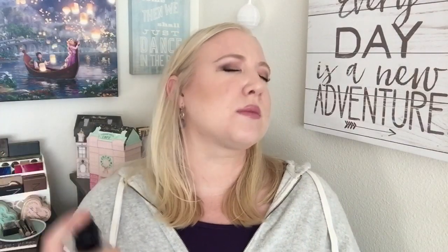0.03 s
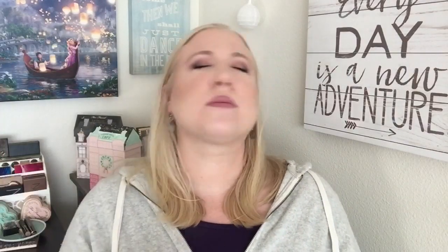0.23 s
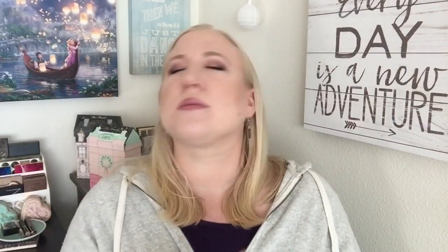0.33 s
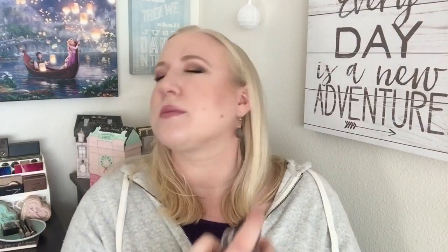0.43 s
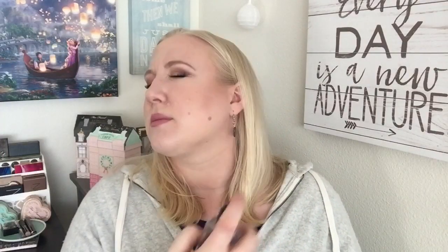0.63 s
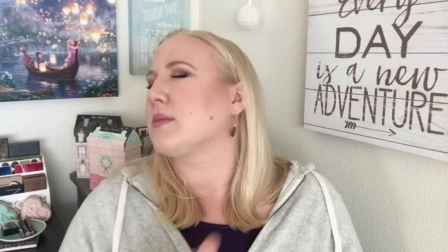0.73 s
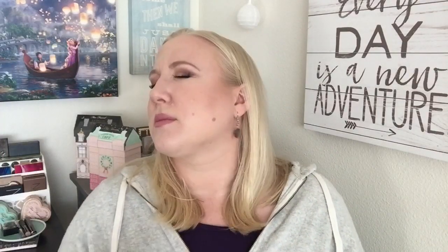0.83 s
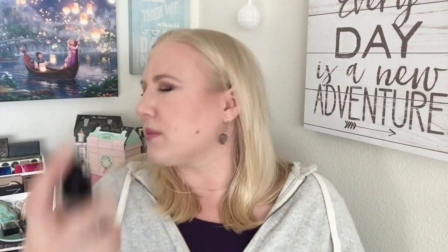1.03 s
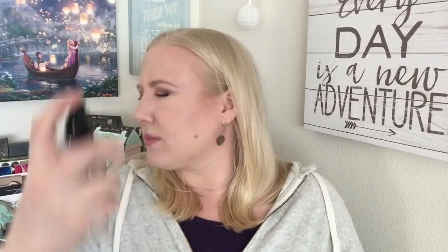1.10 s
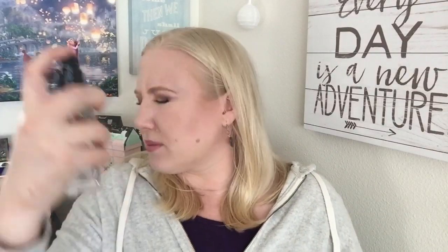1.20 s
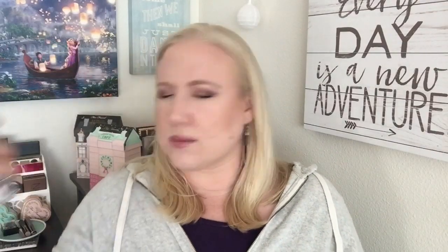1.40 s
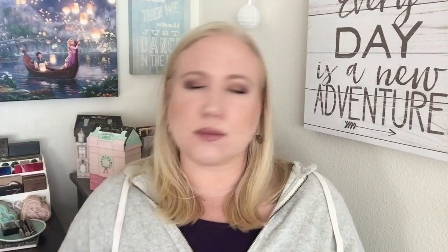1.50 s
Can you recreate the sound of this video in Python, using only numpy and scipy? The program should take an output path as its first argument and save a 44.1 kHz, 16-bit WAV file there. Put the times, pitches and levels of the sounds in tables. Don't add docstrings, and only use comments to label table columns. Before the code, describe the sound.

A plastic pump mist sprayer close to the microphone in a small furnished room. A short airy puff at 0.04 s, then three juddering strokes at about 0.23, 0.46 and 0.69 s, each a tenth-second train of sharp creaky cracks with a hollow bottle ring. Light ticks between; a faint puff at 0.98, a longer one at 1.21. Low hum; background hiss drops away near 1.4.

```python
import sys
import numpy as np
from scipy import signal
from scipy.fft import rfft, irfft, next_fast_len
from scipy.io import wavfile
from scipy.ndimage import uniform_filter1d, map_coordinates

SR = 44100
rng = np.random.default_rng(int(sys.argv[2]) if len(sys.argv) > 2 else 0)


def voltage_ratio(decibels):
    exponent = np.asarray(decibels, float) / 20
    return 10 ** exponent


def waveform_to_disk(signal):
    frames = np.transpose(np.atleast_2d(signal))
    scaled = np.clip(frames, -1, 1) * 32767
    samples = np.round(scaled).astype(np.int16)
    wavfile.write(sys.argv[1], SR, samples)


N = 68355


def along(points, hz):
    f, v = np.transpose(points)
    return np.interp(np.log(hz + 1), np.log(f + 1), v)


def coloured(spectrum):
    m = next_fast_len(N + 8192)
    gain = voltage_ratio(along(spectrum, np.fft.rfftfreq(m, 1 / SR)))
    x = irfft(rfft(rng.standard_normal(m)) * gain, m)[:N]
    return x / np.std(x)


def wobble(rate_hz):
    knots = rng.standard_normal(int(N * rate_hz / SR) + 4)
    return map_coordinates(knots, [np.arange(N) * rate_hz / SR])


def add(out, s, sound):
    out[round(s * SR):][:len(sound)] += sound


# [f/Hz, level/dB per Hz]
AIR_SPECTRUM = [(53, -45), (119, -4), (300, -13), (900, -15), (3000, -22), (7000, -25), (10000, -32),
                (16500, -39)]
# [f/Hz, level/dB per Hz]
HUM_SPECTRUM = [(25, -37.5), (40, -17), (54, -8.5), (70, -12), (95, -29.5), (140, -120)]
# [f/Hz, level/dB per Hz]
HISS_SPECTRUM = [(1000, -16), (3000, 2), (8000, -4.5), (16000, -5.5)]
AIR_DB, HUM_DB, HISS_DB = -71, -76.5, -72.5
HISS_END_S, HISS_FADE_S = 1.423, 0.068


def steady_floor():
    hiss_gate = np.clip((HISS_END_S - np.arange(N) / SR) / HISS_FADE_S, 0, 1)
    air = voltage_ratio(AIR_DB) * coloured(AIR_SPECTRUM)
    hum = voltage_ratio(HUM_DB) * coloured(HUM_SPECTRUM)
    return air + hum + voltage_ratio(HISS_DB) * hiss_gate * coloured(HISS_SPECTRUM)


SCATTER_DB, DETUNE = 2, .025


def ring(modes, pitch_hz, attack_s, luck):
    t = np.arange(SR // 10) / SR
    out = np.zeros(len(t))
    for (ratio, db, t60_s), (a, b) in zip(modes, luck):
        decay = voltage_ratio(db + SCATTER_DB * a - 60 * t / t60_s)
        out += decay * np.sin(2 * np.pi * pitch_hz * ratio * (1 + DETUNE * b) * t)
    return (1 - np.exp(-t / attack_s)) ** 2 * out


# [f/Hz, level/dB, t60/s]
HEAD_MODES = [(4260, -3, 0.0018), (7050, 0.5, 0.0021), (8000, 0, 0.00093), (12010, -1.5, 0.0023),
              (14100, -14, 0.0004)]
# [t/s, f/Hz]
GRIP_PITCH = [(.0, 1010), (.3, 1000), (.5, 920), (.75, 930), (1.1, 1000), (1.4, 1040)]
SNAP_DB, SNAP_T60_S = -12, .004


def contacts(rows, middle, middle_hz, body, attack_s, gain_db, variety):
    out, luck = np.zeros(N + SR), rng.standard_normal((len(rows), 3, 5, 2))
    t = np.arange(SR // 100) / SR
    snaps = np.diff(rng.standard_normal((len(rows), len(t) + 1))) * voltage_ratio(SNAP_DB - 60 * t / SNAP_T60_S)
    for (s, crack_db, middle_db, bottle_db), hz, z, snap in zip(rows, middle_hz, luck, snaps):
        bottle_hz = np.interp(s, *np.transpose(GRIP_PITCH))
        add(out, s, voltage_ratio(crack_db) * snap)
        add(out, s, voltage_ratio(crack_db - 1.5) * ring(HEAD_MODES, 0.96, .00005, variety * z[0]))
        add(out, s, voltage_ratio(middle_db + 3) * ring(middle, hz, 0.0001, variety * z[1]))
        add(out, s, voltage_ratio(bottle_db + gain_db) * ring(body, bottle_hz, attack_s, .25 * z[2]))
    return out[:N]


# [t/s, crack/dB, cap/dB, bottle/dB]
TICKS = [(0.008, -38, -51.5, -37.5), (0.1673, -70, -53, -52), (0.1987, -38.5, -55, -61),
         (0.3788, -39, -43, -44), (0.434, -47, -70, -49), (0.61, -35, -66, -56), (0.667, -52, -71, -73),
         (0.8958, -43.5, -56, -70), (0.9315, -46, -42.5, -72), (0.936, -38, -73, -63),
         (0.9395, -33.5, -57, -79), (1.0922, -36, -39.5, -48.5), (1.1189, -37, -40.5, -77),
         (1.1232, -43.5, -67, -61), (1.1736, -44.5, -51.5, -56), (1.3772, -37.5, -48.5, -45.5)]
# [t/s, crack/dB, cap/dB, bottle/dB]
OPENING_KNOCK = (.0001, -52, -62, -50)
# [f/Hz, level/dB, t60/s]
CAP_MODES = [(3300, 0, .006), (1950, -6, .006), (1550, -7, .006), (4000, -6, .003), (2600, -8, .004)]
# [ratio to pitch, level/dB, t60/s]
KNOCKED_BOTTLE_MODES = [(1.001, -1, .018), (1.45, -12, .012), (3.55, -19, .015)]


def ticks():
    rows = TICKS + [OPENING_KNOCK]
    unit_pitch = np.ones(len(rows))
    return contacts(rows, CAP_MODES, unit_pitch, KNOCKED_BOTTLE_MODES, 0.0051, 20.5, 0.74)


# [start t/s, hold/s, release/s, level/dB]
PUFFS = [
    (0.038, 0.058, 0.084, -47.5),
    (0.981, 0.037, 0.094, -55),
    (1.211, 0.068, 0.12, -50),
]
# [f/Hz, level/dB per Hz]
MIST_SPECTRUM = [(410, -64), (700, -27.5), (934, -26.5), (1730, -7), (3410, -4.5), (4860, -5),
                 (11800, -11.5), (16000, -13)]
PUFF_ATTACK_S, SAG_DB_PER_S = 0.016, 53


def mist():
    t = np.arange(N) / SR
    pressure = np.zeros(N)
    for s, hold_s, release_s, db in PUFFS:
        sag_db = SAG_DB_PER_S * np.clip(t - s, 0, None)
        bleed_db = 60 * np.clip(t - s - hold_s, 0, None) / release_s
        pressure += voltage_ratio(db - sag_db - bleed_db) * np.clip((t - s) / PUFF_ATTACK_S, 0, 1) ** 1.1
    droplets = voltage_ratio(0.8 * wobble(1500) + 0.44 * wobble(93.7))
    return voltage_ratio(3) * pressure * droplets * coloured(MIST_SPECTRUM)


# [start t/s, end t/s, scrape/dB, final neck f/Hz]
STROKES = [
    (.229, .315, -47, 2100),
    (.461, .562, -48, 2400),
    (.693, .80, -49, 2100),
]
NECK_START_HZ, NECK_FALL_S = 4190, 0.025


def neck_hz(s):
    start, _, _, end_hz = max(row for row in STROKES if row[0] - .005 < s)
    return end_hz + (NECK_START_HZ - end_hz) * np.exp(-(s - start) / NECK_FALL_S)


# [t/s, crack/dB, neck/dB, bottle/dB]
SLIPS = [(0.2294, -25.5, -37.5, -46.5), (0.2344, -22.5, -37, -59), (0.241, -20, -28, -63),
         (0.2473, -13.5, -36, -32.5), (0.2593, -10.5, -19, -26), (0.2752, -9.5, -15, -27.5),
         (0.2921, -12, -16.5, -27.5), (0.3049, -19, -18, -42), (0.3106, -28, -23.5, -31),
         (0.4616, -25.5, -43, -47), (0.4685, -27, -30.5, -47), (0.4774, -14.5, -28, -27),
         (0.4895, -18.5, -18.5, -25), (0.5035, -17.5, -24.5, -25.5), (0.5189, -14, -18, -24.5),
         (0.5335, -18, -18.5, -24), (0.548, -22, -20, -39), (0.5601, -24.5, -31.5, -75),
         (0.6931, -23.5, -35, -48.5), (0.7017, -20, -25.5, -33.5), (0.7135, -15.5, -23.5, -26.5),
         (0.7274, -26, -20, -27.5), (0.7428, -17.5, -25.5, -24.5), (0.7568, -28, -17.5, -34),
         (0.7688, -21, -27.5, -28.5), (0.7816, -18, -23.5, -60), (0.794, -22, -28, -35.5)]
# [t/s, level/dB, f/Hz]
COIL_CATCHES = [(0.2556, -19, 3100), (0.2709, -21, 2830), (0.2867, -23.5, 2250), (0.4737, -29, 3380),
                (0.4862, -28.5, 2940), (0.501, -17.5, 2390), (0.5161, -27, 2013), (0.5313, -41, 2600),
                (0.5467, -49, 2450), (0.7101, -25.5, 2920), (0.7246, -59, 2430), (0.7403, -27, 3840),
                (0.7565, -23.5, 2410)]
# [ratio to pitch, level/dB, t60/s]
NECK_MODES = [(1.01, -2, .006), (.78, -7, .005), (1.45, -6, .004), (.6, -8, .004)]
# [ratio to pitch, level/dB, t60/s]
BOTTLE_MODES = [(1.001, -3, 0.037), (1.223, -6.5, 0.026), (0.645, -8.5, 0.018), (0.3, -14, 0.0056)]
# [f/Hz, level/dB per Hz]
SCRAPE_SPECTRUM = [(180, -53), (300, -26.5), (762, -18), (930, -7.5), (1340, -7.5), (2480, -7.5),
                   (4990, -21.5), (11700, -15), (16000, -35)]


def piston():
    catches, push, t = np.zeros(N + SR), np.zeros(N), np.arange(N) / SR
    for (s, db, hz), z in zip(COIL_CATCHES, rng.standard_normal((len(COIL_CATCHES), 4, 2))):
        add(catches, s, voltage_ratio(db + 3.5) * ring(NECK_MODES, hz, 0.00018, .5 * z))
    for start, end, db, _ in STROKES:
        push += voltage_ratio(db) * np.clip((t - start) / 0.049, 0, 1) * np.clip((end - t) / 0.0045, 0, 1)
    scrape = push * voltage_ratio(2 * wobble(500)) * coloured(SCRAPE_SPECTRUM)
    pitch_hz = [neck_hz(row[0]) for row in SLIPS]
    return catches[:N] + scrape + contacts(SLIPS, NECK_MODES, pitch_hz, BOTTLE_MODES, .0005, 3, .8)


# [f/Hz, t60/s]
ROOM_DECAY = [(300, 0.23), (1000, 0.31), (3000, .28), (8000, 0.28), (15000, 0.28)]
# [delay t/s, level/dB]
NEAR_SURFACES = [(.0028, -14.5), (.0047, -19.5), (.0085, -25)]
WET_DB, EARLY_DB, EARLY_T60_S = -7, -8, .035


def room(x):
    hz, t, z = signal.stft(rng.standard_normal(SR // 2), SR, nperseg=256)
    decay = voltage_ratio(-60 * t / along(ROOM_DECAY, hz)[:, None])
    tail = signal.istft(z * decay, SR, nperseg=256)[1]
    early = rng.standard_normal(len(tail)) * voltage_ratio(-60 * np.arange(len(tail)) / SR / EARLY_T60_S)
    diffuse = voltage_ratio(WET_DB) * tail / np.linalg.norm(tail) + voltage_ratio(EARLY_DB) * early / np.linalg.norm(early)
    answer = np.pad(diffuse, (80, 0))
    for s, db in NEAR_SURFACES:
        answer[round(s * SR)] += voltage_ratio(db)
    return x + signal.fftconvolve(x, answer)[:N]


def scene():
    dry = ticks() + mist() + piston()
    part = np.floor((np.arange(N) / SR + .01) / .235)
    return sum(room(dry * (part == k)) for k in np.unique(part))[None]


GATE_DB, GATE_SLOPE, GATE_DEPTH_DB, GATE_S = -58, 1.5, 10, .008


def suppress(x):
    power = np.abs(uniform_filter1d(x ** 2, round(GATE_S * SR), axis=1))
    level_db = 10 * np.log10(power + 1e-12)
    return x * voltage_ratio(-np.clip(GATE_SLOPE * (GATE_DB - level_db), 0, GATE_DEPTH_DB))


LOW_CUT_HZ, TOP_HZ = 300, 15900


def band_limit(x):
    return signal.sosfilt(signal.butter(12, 16990, fs=SR, output="sos"), x)


def record(dry):
    hz = np.fft.rfftfreq(2 * N, 1 / SR)
    low_cut = (1j * hz / (LOW_CUT_HZ + 1j * hz)) ** 2
    top_cut = np.clip((TOP_HZ + 150 - hz) / 500, 0, 1) ** 2
    both = rfft(suppress(dry), 2 * N) * low_cut + rfft(steady_floor(), 2 * N)
    return band_limit(irfft(both * top_cut, 2 * N)[:, :N])


dry = scene()
out = record(dry)
waveform_to_disk(out)
```